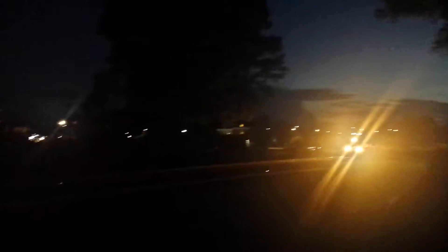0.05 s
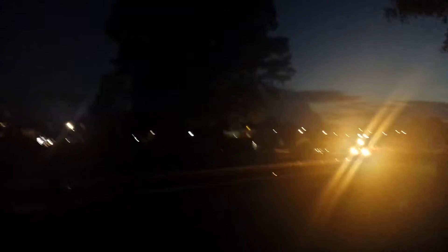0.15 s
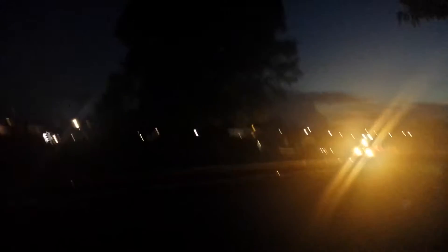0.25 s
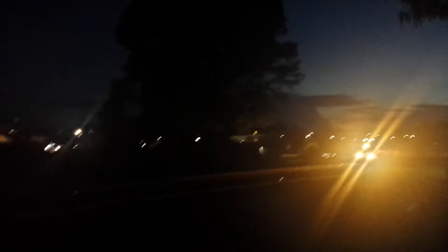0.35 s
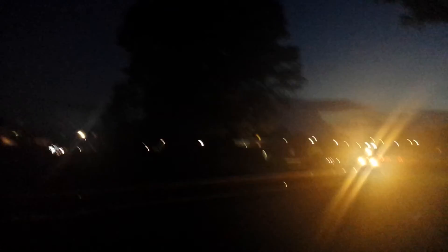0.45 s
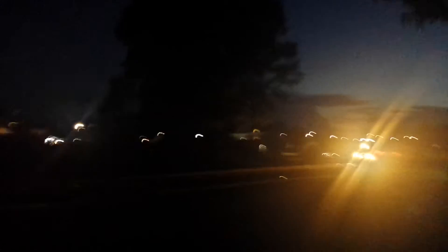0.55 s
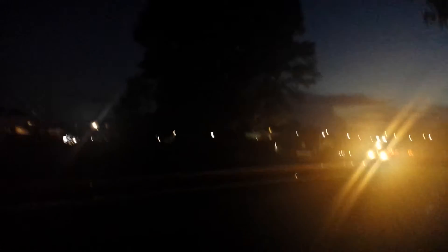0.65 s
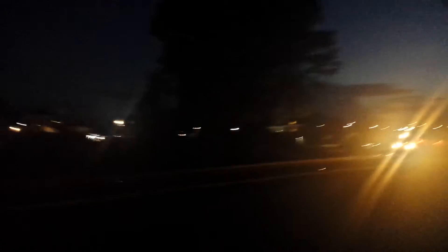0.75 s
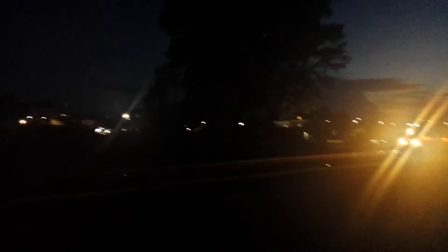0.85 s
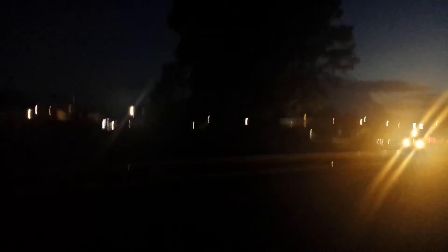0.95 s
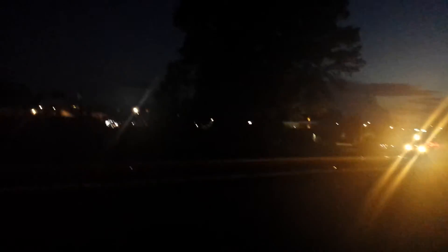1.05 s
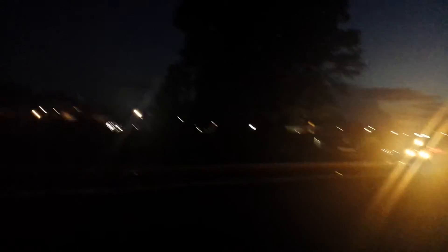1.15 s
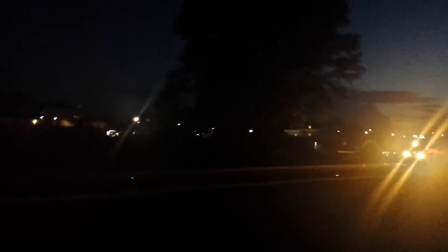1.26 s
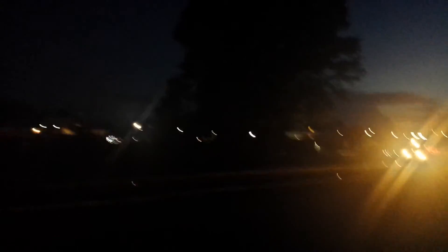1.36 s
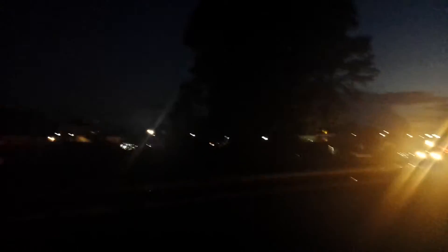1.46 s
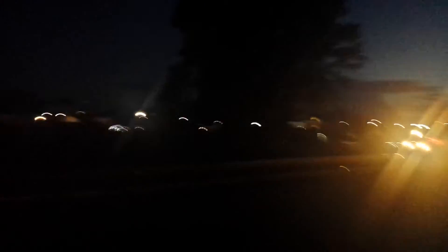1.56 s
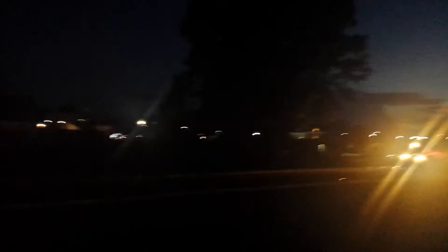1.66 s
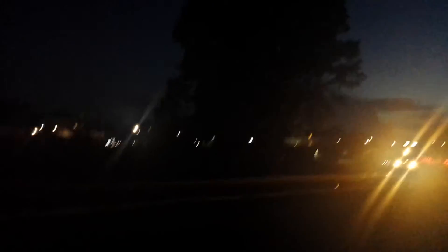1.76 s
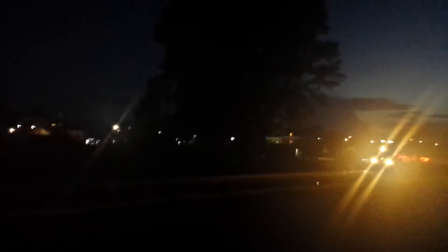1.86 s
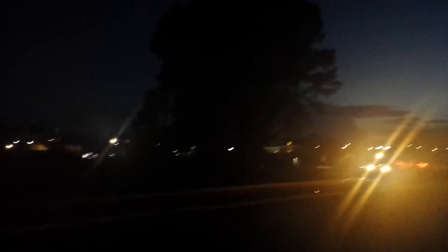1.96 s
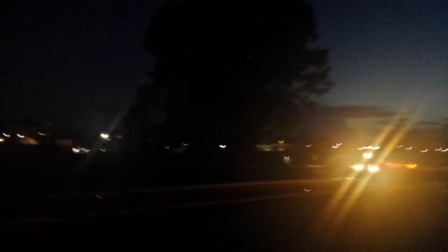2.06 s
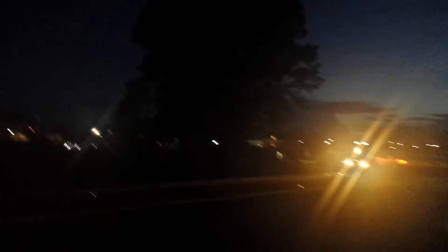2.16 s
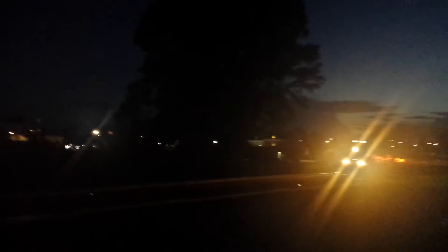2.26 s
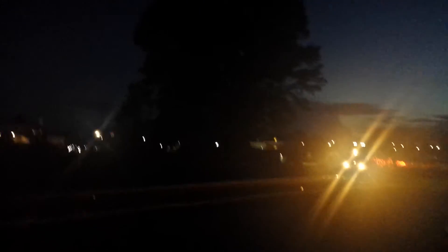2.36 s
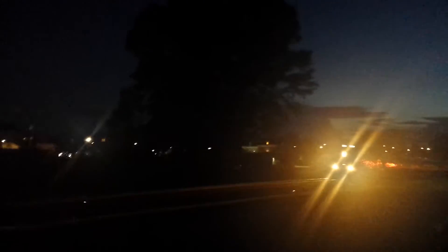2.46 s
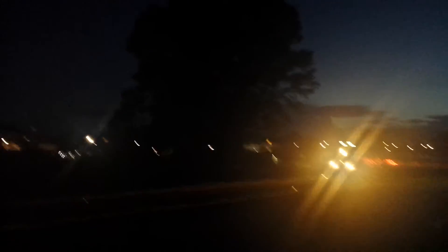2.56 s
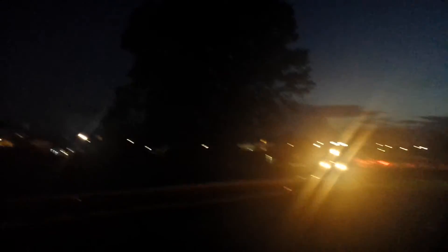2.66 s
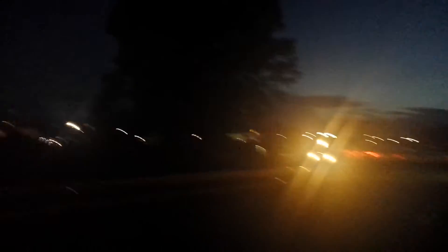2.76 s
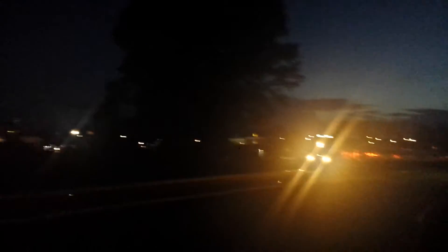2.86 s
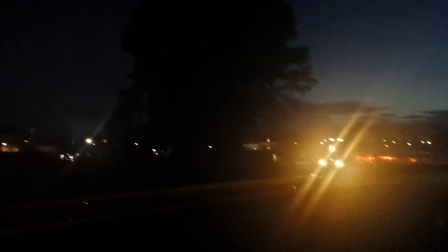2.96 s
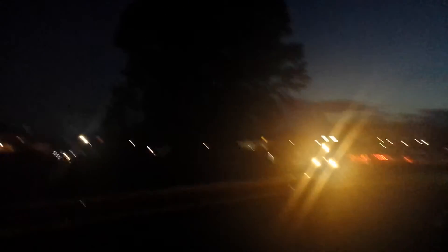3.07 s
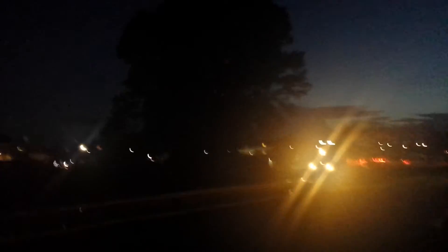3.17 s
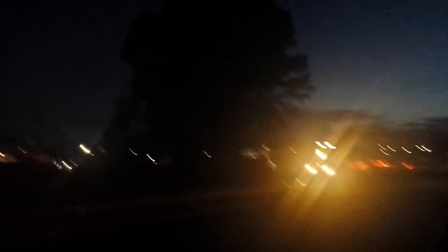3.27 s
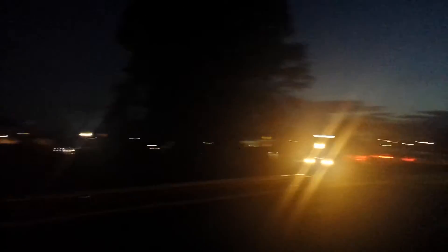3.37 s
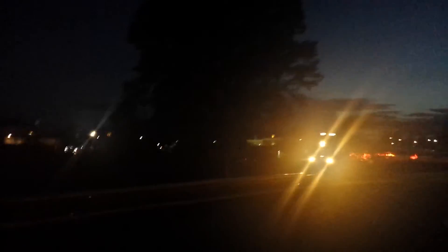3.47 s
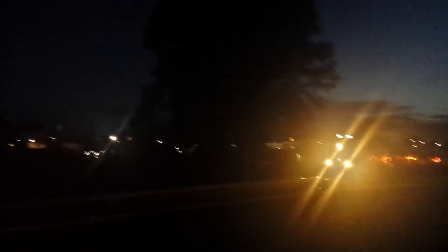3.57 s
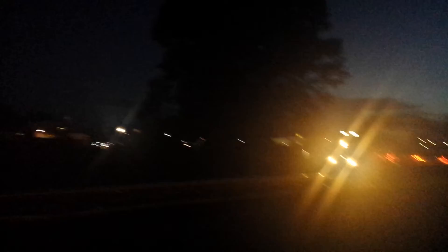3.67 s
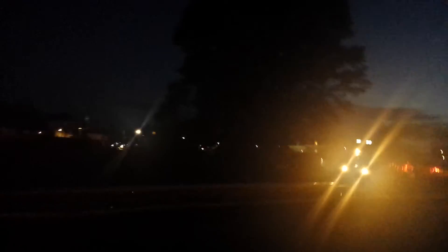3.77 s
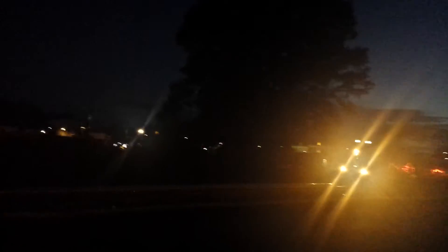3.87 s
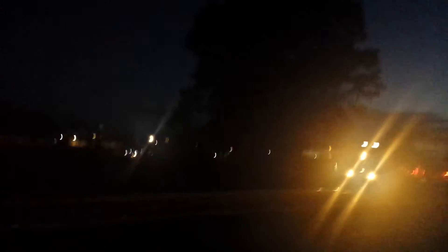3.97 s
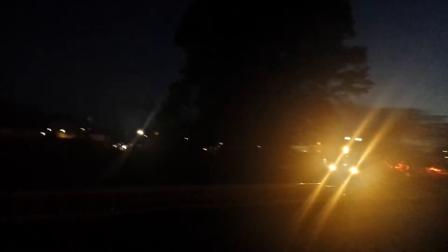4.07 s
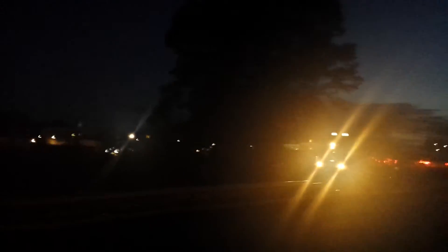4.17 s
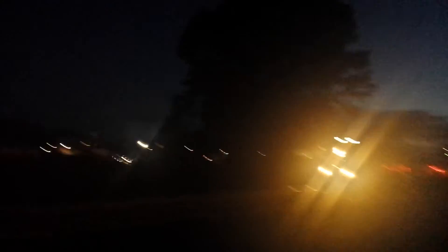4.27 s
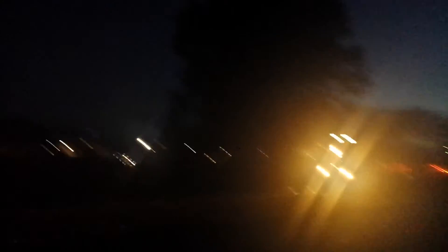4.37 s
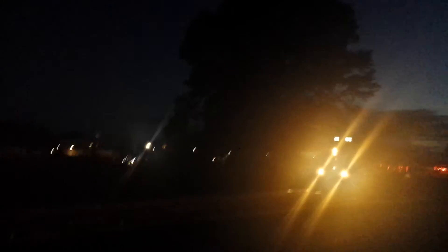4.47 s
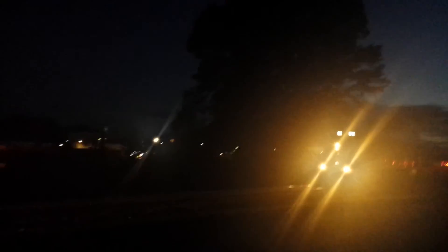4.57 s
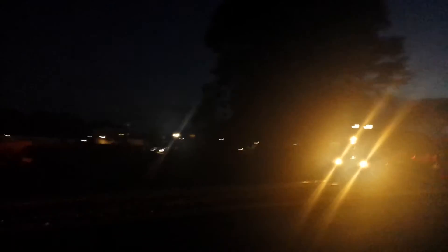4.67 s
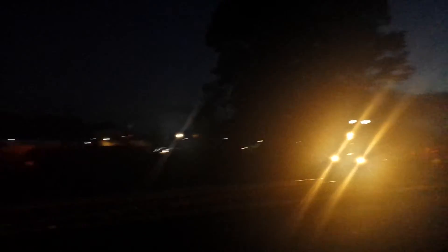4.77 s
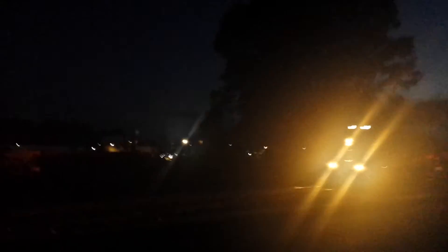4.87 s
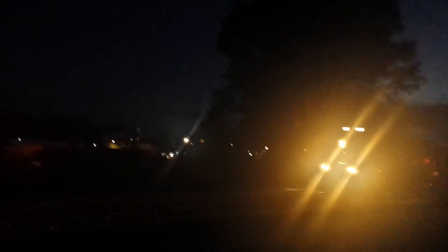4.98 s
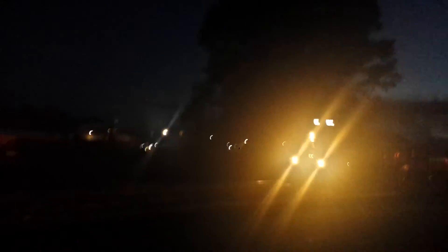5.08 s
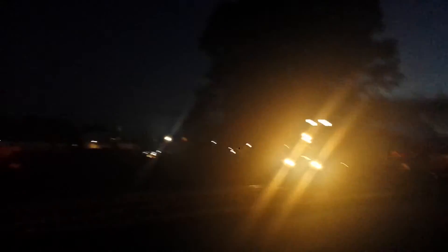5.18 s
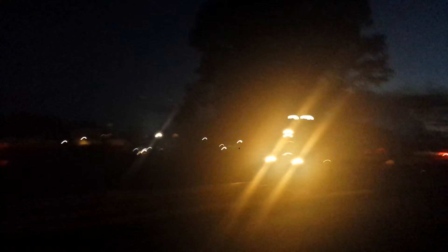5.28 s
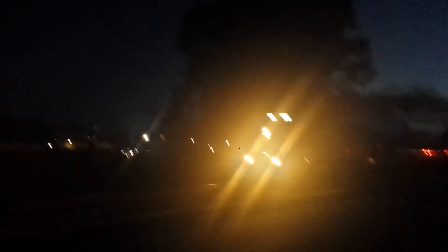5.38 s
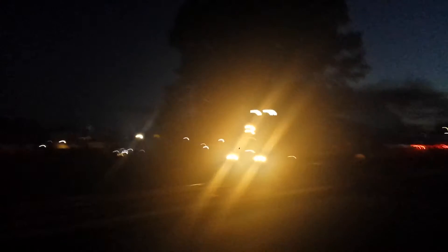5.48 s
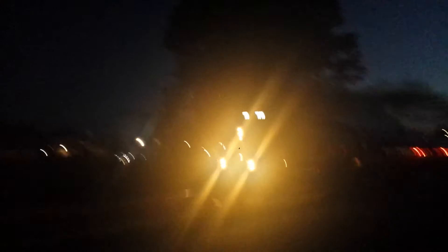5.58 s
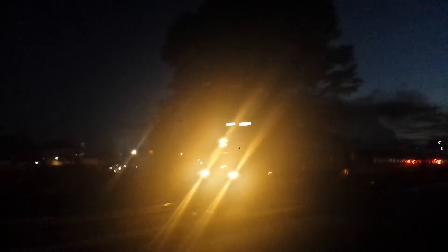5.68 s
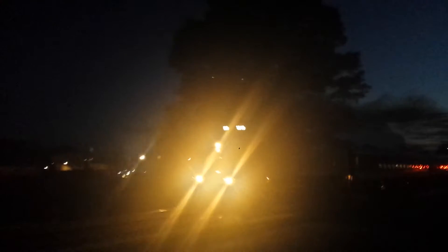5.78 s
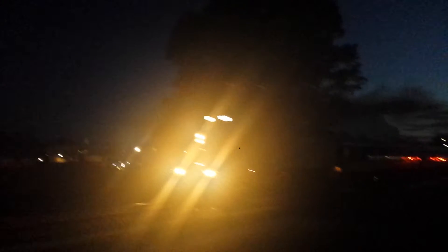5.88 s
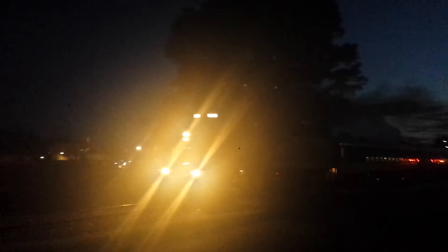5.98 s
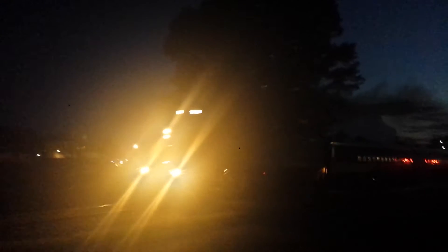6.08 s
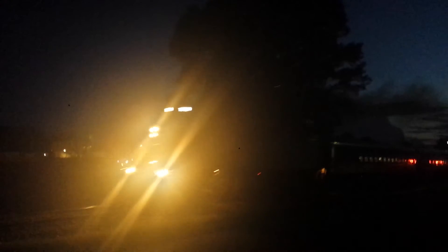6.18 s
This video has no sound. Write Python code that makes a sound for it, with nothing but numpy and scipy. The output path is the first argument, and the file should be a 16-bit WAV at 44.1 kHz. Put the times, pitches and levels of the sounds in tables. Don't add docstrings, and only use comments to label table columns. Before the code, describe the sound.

A dense, buzzing low diesel drone dominates, pulsing quickly and rising very slightly in pitch before steadying. Wheel rumble and sharp steel hiss build around it as the train nears. A single input thump comes early, faint gear and fan whines drift through, and knocks, ticks and thin flange chirps appear late. Mono, open air, slightly compressed; it ends with the train still present.

```python
import sys
import numpy as np
from scipy import signal
from scipy.fft import rfft, irfft
from scipy.io import wavfile
from scipy.ndimage import uniform_filter1d, minimum_filter1d

SR = 44100
rng = np.random.default_rng(int(sys.argv[2]) if len(sys.argv) > 2 else 0)


def transcribe(signal):
    frames = np.atleast_2d(signal).T
    limited = np.clip(frames, -1, 1)
    pcm = np.round(limited * 32767).astype(np.int16)
    wavfile.write(sys.argv[1], SR, pcm)


def boost_factor(decibels):
    exponent = np.asarray(decibels, float) / 20
    return 10 ** exponent


N = 275184
TIME = np.arange(N) / SR
COARSE = TIME[::32]

# (time [s], rate [turns/s])
SHAFT_SPEED = [
    (.3, 14.48),
    (1, 14.63),
    (2, 14.87),
    (3, 15.1),
    (3.8, 15.22),
    (4.3, 15.16),
    (6.3, 15.16),
]
# (order [multiple of shaft rate], level [dB], polarity [+1 or -1])
BOOM_ORDERS = [(3, -25, 1), (4, -25, -1), (5, -4.8, 1), (6, -3.5, 1), (7, -10, 1)]
MAIN_ORDERS = [(8, -15, -1), (9, -.5, 1)]
NEIGHBOUR_ORDERS = [(10, -.5, 1), (11, -10.5, 1), (13, -14, -1)]
BARK_ORDERS = [(12, -14, -1), (14, -10, 1), (15, -2.5, 1), (16, -35, 1), (17, -17.5, -1), (18, -19.5, -1)]
# (time [s], loudness with effort and distance [dB], ground-bounce lift of main order [dB])
ENGINE_EFFORT = [(.5, -4, -0.5), (.93, -4, -1), (1.3, -4.5, -1), (1.72, -4.5, 0), (2.0, -4, 0.5),
                 (2.3, -2, -0.3), (2.93, -1.5, 3), (3.39, -0.2, -0.2), (3.7, 0, -3), (4.17, 1.5, 1),
                 (4.3, 2.5, -1), (4.57, -0.5, 2), (4.95, 1, -1.5), (5.25, 0, 0), (5.54, -0.5, 0),
                 (5.64, -2.5, -0.5), (6.11, -3, 0.5), (6.24, -7, -0.5)]
# (level [dB], share of loudness [1], share of bounce [1], slope once turned aside [dB/s])
STACK_RULE = [
    (-23, 0.23, 0.052, 0.04),
    (-16.5, 0.92, 1.05, .1),
    (-20.5, 1.15, -0.35, 0.5),
    (-26.5, 0.17, .01, -7),
]
# (frequency [Hz], density [dB per Hz])
RUMBLE_SPECTRUM = [(20, -38), (45, -25), (65, -3.5), (140, 2), (240, -6.5), (330, -10), (450, -40.5)]
# (frequency [Hz], density [dB per Hz])
ROLL_SPECTRUM = [(260, -10), (476, -13), (600, -8.5), (720, -6.5), (860, -15.5), (1150, -11.5),
                 (1400, -15.5), (2600, -15.5), (3650, -13), (3950, -10), (5850, -2.5), (7600, -11),
                 (8300, -21), (13000, -35.5)]
ROLL_HZ = [600, 2000, 5500, 11000]
# (time [s], level [dB])
NEARNESS = [(.6, -5.5), (.95, -5.5), (1.24, -5), (1.72, -4.5), (1.9, -3), (2.17, -0.7), (2.35, -3.5),
            (2.65, -2.5), (3.0, -0.7), (3.5, 0.45), (4.07, 1.5), (4.43, 3), (4.55, 1.5), (5.1, 3.5),
            (5.33, 0.4), (5.6, 3.2), (5.9, 2.5), (6.24, 3.2)]
# (share of nearness [1], change as cab draws level [dB], regained after [dB/s])
ROLL_RULE = [
    (.3, -.8, -2),
    (.45, -3, 3),
    (1.01, 3.1, -0.2),
    (1.6, -13.5, 15.5),
]
# (time [s], boost [dB], length [s], centre [Hz])
JOINTS = [
    (2.316, 4.5, 0.018, 600),
    (2.45, 3, 0.038, 600),
    (2.902, 2.5, .02, 600),
    (4.762, 5, 0.023, 506),
    (5.233, 5, 0.012, 700),
    (5.31, 2, 0.02, 700),
    (5.322, 9, 0.045, 13200),
    (5.396, 7.5, 0.053, 1300),
    (5.49, 5, 0.018, 13000),
    (5.532, 7, .012, 500),
]
# (time [s], lag [ms], strength [0-1])
GROUND = [
    (0, 1.75, 0),
    (5.4, 1.7, .05),
    (5.65, 1.5, .5),
    (5.9, 1.4, .58),
    (6.24, 1.33, .58),
]
ECHO_BAND_HZ = [1070, 3440]
# (frequency [Hz], width [Hz], level [dB], gain as train arrives [dB])
RAIL_MODES = [(2990, 19, -33, -11), (4374, 56, -17, 11.5), (4640, 320, -24, 13), (4940, 150, -15.5, 8.5),
              (5160, 36, -16.5, 9), (5760, 34, -13, 2), (5820, 63, -8, 3.5), (5950, 39, -10, -0.5),
              (6270, 66, -24, -5), (6740, 74, -12.5, 0.5), (6800, 62, -15, -4), (7700, 46, -21.5, -7),
              (8640, 250, -24, -5), (11700, 44, -32.5, -4)]
# (time [s], peak [dB], length [s])
SINGING = [(1.27, -30, .05), (1.99, -30, .04), (2.23, -30, .07), (2.75, -31, 0.063), (3.03, -27, .06),
           (3.34, -22, 0.036), (3.61, -22, .06), (4.02, -26, .05), (4.42, -17, 0.046), (4.77, -32, .08),
           (5.03, -30, .07), (5.2, -14, .04), (5.44, -15, 0.045), (5.62, -14, 0.043)]
# (frequency [Hz], density [dB per Hz])
PORT_SPECTRUM = [(12500, -17.5), (13400, -7), (13900, -6), (14300, -4), (14800, -9), (15500, -12),
                 (16500, -22)]
# (time [s], peak [dB], length [s])
GEAR_SWELLS = [(.95, -34.5, 0.13), (1.18, -33.5, 0.078), (1.52, -36.5, .1), (1.82, -33, 0.076),
               (2.15, -39, .08), (2.4, -42, .1), (2.92, -33, 0.14), (3.4, -39, 0.13), (3.9, -42, 0.32),
               (4.5, -37.5, .2), (5.0, -31, .15), (5.42, -34.5, 0.12), (5.76, -39, .08), (6.2, -40, .08)]
# (time [s], peak [dB], length [s])
FAN_SWELLS = [(.95, -44, .08), (1.25, -46, 0.088), (1.7, -43, .08), (2.04, -40, 0.11), (2.42, -40, 0.055),
              (2.78, -40, 0.13), (3.16, -45, 0.055), (4.05, -46, .15), (4.71, -47, 0.055), (5.36, -47, .04)]
# (time [s], peak [dB], length [s])
BLOWER_SWELLS = [
    (3.75, -32, .12),
    (4.4, -35, .17),
    (5.1, -34, 0.15),
    (5.5, -37, 0.11),
    (6.1, -41, 0.1),
]
# (time [s], peak [dB], length [s])
SQUEAL_CHIRPS = [
    (5.79, -40, 0.044),
    (6.0, -41, 0.11),
    (6.155, -31.5, .03),
]
# (time [s], gain [dB])
LIMITER = [
    (.997, 4.5),
    (1.001, -4),
    (1.019, -5),
    (1.022, 5.5),
    (1.06, 5.5),
]
# (time [s], gain [dB])
AUTO_GAIN = [
    (.97, -0.2),
    (1.05, -2.4),
    (1.5, -2.3),
    (1.72, -5),
    (1.9, -1.5),
    (2.05, -0.8),
]

CAB_LEVEL_S = 5.56


def rms_one(x):
    return x / np.sqrt(np.mean(x ** 2) + 1e-20)


def in_time(rows):
    s, *columns = np.transpose(rows)
    return [np.interp(TIME, s, c) for c in columns]


def drift(rate):
    r = np.exp(-80 * np.pi * rate / SR)
    slow = signal.lfilter([1], [1, -2 * r, r * r], rng.standard_normal(N // 40 + 2002))[2000:]
    return np.interp(np.arange(N) / 40, np.arange(len(slow)), rms_one(slow))


def coloured(spectrum):
    hz, level_db = np.transpose(spectrum)
    log_hz = np.log(np.arange(1, N // 2 + 2) * SR / N)
    weight = boost_factor(np.interp(log_hz, np.log(hz), level_db))
    return rms_one(irfft(rfft(rng.standard_normal(N)) * weight, N))


def whistle(hz, width):
    r = np.exp(-np.pi * max(width, 3) / SR)
    pole = [1, -2 * r * np.cos(2 * np.pi * hz / SR), r * r]
    once = signal.lfilter([1, 0, -1], pole, rng.standard_normal(N))
    return rms_one(signal.lfilter([1], pole, once))


def bells(rows):
    total = sum(top * np.exp(-.5 * ((COARSE - s) / max(length, .005)) ** 2) for s, top, length in rows)
    return np.interp(TIME, COARSE, total)


def swells(rows, floor_db):
    return boost_factor(floor_db) + bells([(s, boost_factor(peak_db), length) for s, peak_db, length in rows])


def crank_angle():
    skipped_turns = .339 * (TIME > 5.331)
    turns = np.cumsum(in_time(SHAFT_SPEED)[0]) / SR - .369 + skipped_turns
    return 2 * np.pi * turns


def stack_db():
    loud_db, bounce_db = in_time(ENGINE_EFFORT)
    aside_s = np.maximum(TIME - 4.88, 0)
    levels = [level_db + loud * loud_db + bounce * bounce_db + slope * aside_s
              for level_db, loud, bounce, slope in STACK_RULE]
    levels[0] = levels[0] + 2 * np.cos(2 * np.pi * (TIME - 0.56) / 3.9)
    return levels


def firing_orders(angle):
    out = np.zeros(N)
    groups = [BOOM_ORDERS, MAIN_ORDERS, NEIGHBOUR_ORDERS, BARK_ORDERS]
    for orders, group_db in zip(groups, stack_db()):
        for order, level_db, polarity in orders:
            lead_rad = -1.85
            if not 9 <= order <= 11:
                lead_rad += 1.1
            if order == 10:
                lead_rad -= .65
            level = polarity * np.sqrt(2) * boost_factor(group_db + level_db + 0.86 * drift(2.0))
            out += level * np.cos(order * angle + lead_rad + 0.19 * drift(4.6))
    return out


def exhaust_rumble(angle):
    levels = stack_db()
    puffing = boost_factor(1.9 * np.cos(angle - .3) + 1.6 * drift(8.2))
    return boost_factor(.5 * (levels[0] + levels[3]) - 4.5) * puffing * coloured(RUMBLE_SPECTRUM)


def clatter_db(hz):
    rows = []
    for s, boost_db, length, centre_hz in JOINTS:
        octaves = np.log2(hz / centre_hz)
        rows.append((s, boost_db * np.exp(-.5 * (octaves / 0.71) ** 2), length))
    return bells(rows)


def roll_db():
    near_db = in_time(NEARNESS)[0]
    late_s = np.clip(TIME - CAB_LEVEL_S, 0, 1)
    cab_level = .5 + .5 * np.tanh((TIME - CAB_LEVEL_S) / 0.031)
    return np.array([share * near_db + cab_level * step_db + regain_db * late_s + clatter_db(hz)
                     for (share, step_db, regain_db), hz in zip(ROLL_RULE, ROLL_HZ)])


def rolling(angle):
    out, levels, together = 0, roll_db(), drift(4.0)
    changes = levels - levels[:, 2 * SR:5 * SR].mean(axis=1, keepdims=True)
    noises = [coloured(ROLL_SPECTRUM) for side in range(2)]
    edges = 222 * 2 ** np.arange(0, 6.2, 1 / 3)
    for k, (low, high) in enumerate(zip(edges, edges[1:])):
        band_pass = signal.butter(2, [low, high], "band", fs=SR, output="sos")
        band = signal.sosfilt(band_pass, noises[k % 2])
        place = np.interp(np.log(low * high) / 2, np.log(ROLL_HZ), range(4))
        below = min(int(place), 2)
        change_db = changes[below] + (place - below) * (changes[below + 1] - changes[below])
        flicker_db = .5 * together + 0.86 * drift(15.5) + 0.17 * np.cos(angle - .5)
        out = out + band * boost_factor(change_db + flicker_db)
    return boost_factor(-21.0) * out


def ground_echo(x):
    lag_ms, strength = in_time(GROUND)
    mirrored = signal.sosfiltfilt(signal.butter(2, ECHO_BAND_HZ, "band", fs=SR, output="sos"), x)
    late = np.interp(TIME - lag_ms / 1000, TIME, mirrored)
    return x - mirrored + (mirrored - strength * late) / np.sqrt(1 + strength ** 2)


def rail_song():
    arrival = 2 * (TIME / TIME[-1]) ** 2 - 1
    modes = sum(boost_factor(level_db + gain_db * arrival + 3.1 * drift(4.4)) * whistle(hz, width)
                for hz, width, level_db, gain_db in RAIL_MODES)
    loudest = swells(SINGING, -52 + 3.5 * TIME) * whistle(5658, 26.0)
    return boost_factor(-20.5 + roll_db()[2] - 7.0) * modes + boost_factor(-6.5) * loudest


def sizzle():
    level_db = -43 + 1.64 * in_time(NEARNESS)[0] + 0.98 * clatter_db(14000) + 0.95 * drift(6.0)
    return boost_factor(level_db) * coloured(PORT_SPECTRUM)


def gear_whine(angle):
    tone = np.sqrt(2) * np.sin(79 * angle + .9 * drift(7.0))
    return tone * boost_factor(-5) * swells(GEAR_SWELLS, -48)


def fan_whine():
    tone = np.sqrt(2) * np.sin(2 * np.pi * 1590 * TIME + 1.3 * drift(3.8))
    return tone * boost_factor(-2.0) * swells(FAN_SWELLS, -54.5)


def blower_whine():
    emerging = np.clip(TIME / 2 - 1.4, 0, 1)
    return whistle(1105, 22.0) * boost_factor(-6.5) * swells(BLOWER_SWELLS, -48) * emerging


def squeal():
    hz = 2680 + 190 * (TIME - SQUEAL_CHIRPS[0][0])
    tone = np.sin(2 * np.pi * np.cumsum(hz) / SR + 1.5 * drift(19.0))
    return np.sqrt(2) * tone * swells(SQUEAL_CHIRPS, -72)


def scene():
    angle = crank_angle()
    engine = firing_orders(angle) + exhaust_rumble(angle)
    machinery = gear_whine(angle) + fan_whine() + blower_whine()
    track = ground_echo(rolling(angle)) + rail_song() + squeal() + sizzle()
    train = engine + machinery + track
    return np.array([train, train])


def fade_in():
    start_s, fade_s = .304, 0.22
    rise = (1 - np.exp(-np.maximum(TIME - start_s, 0) / fade_s)) ** 1.28
    return (TIME > start_s) * np.minimum(boost_factor(-29.5) + rise, 1)


def limit(x):
    ceiling = .9
    needed = minimum_filter1d(ceiling / np.maximum(abs(x), ceiling), size=265)
    return x * uniform_filter1d(needed, size=265)


def input_pop():
    step = 1.0 * (TIME >= 1.0098)
    pop = signal.sosfilt(signal.butter(2, 112, "high", fs=SR, output="sos"), step)
    return .93 * signal.lfilter([.72, .28], [1], pop)


def band_limit(x):
    return signal.sosfilt(signal.butter(12, 16190, fs=SR, output="sos"), x)


def record(dry):
    x = dry * boost_factor(in_time(LIMITER)[0] + in_time(AUTO_GAIN)[0] - 2.5) * fade_in()
    x = signal.sosfilt(signal.ellip(14, .5, 70, 15500, fs=SR, output="sos"), x)
    mix = limit(x) + input_pop()
    return band_limit(mix)


dry = scene()
out = record(dry)
transcribe(out)
```